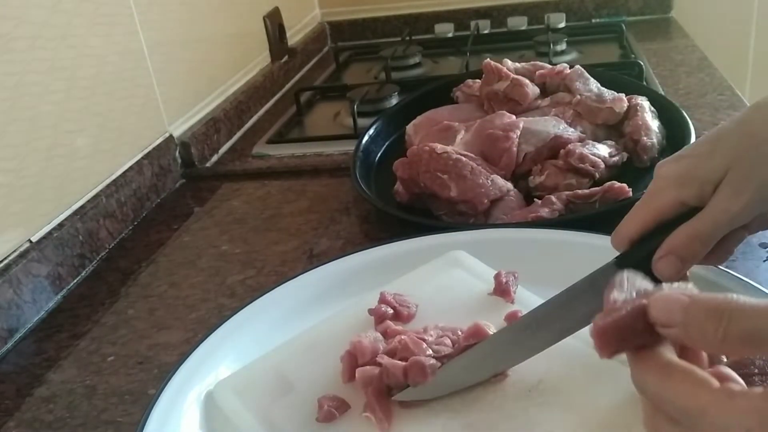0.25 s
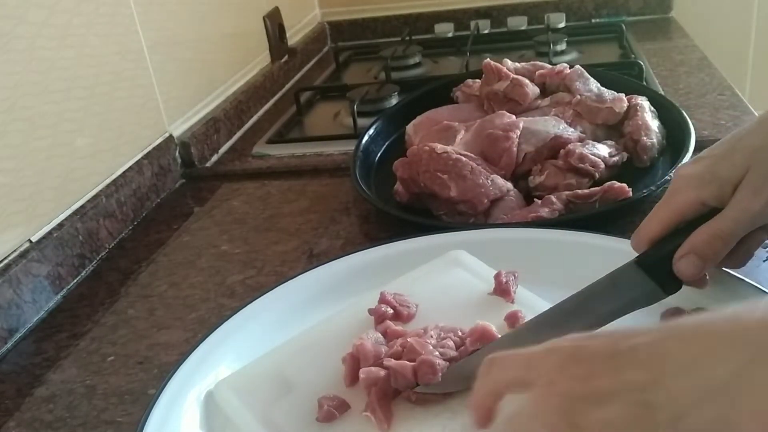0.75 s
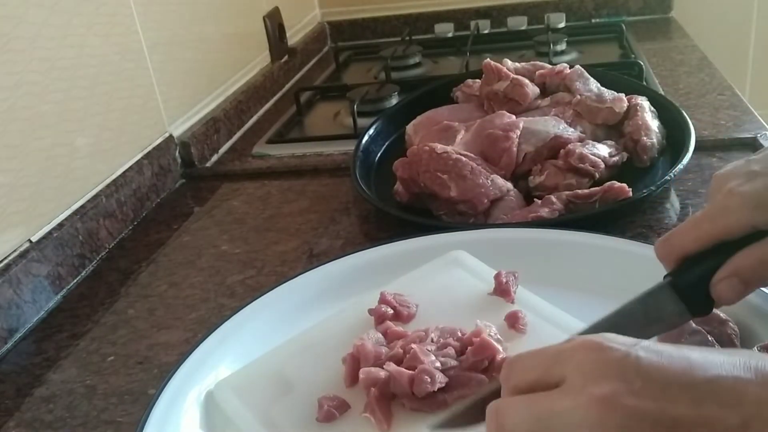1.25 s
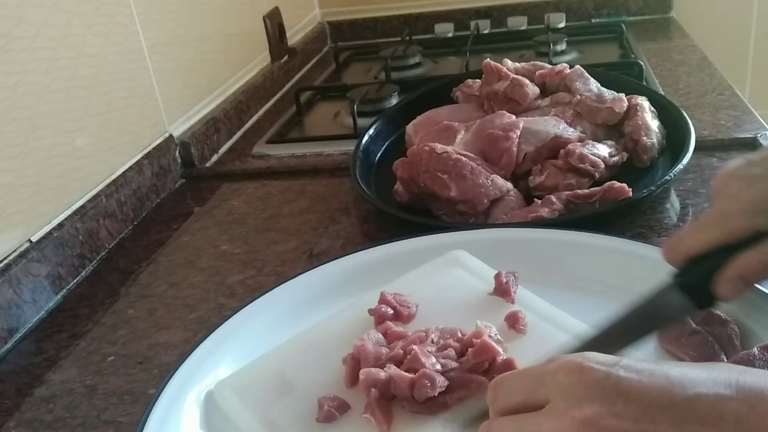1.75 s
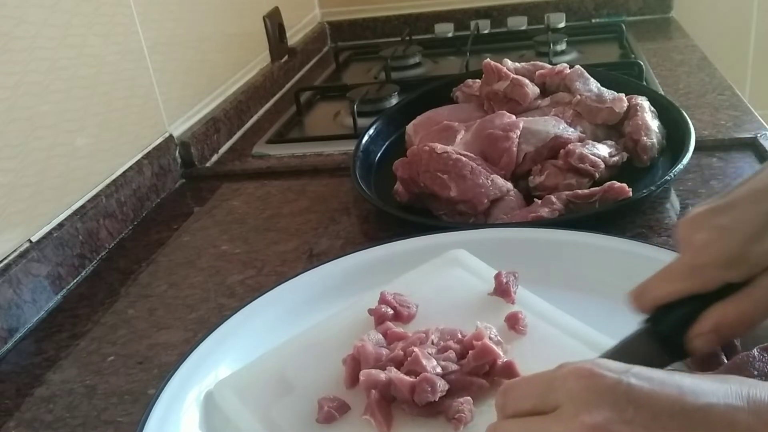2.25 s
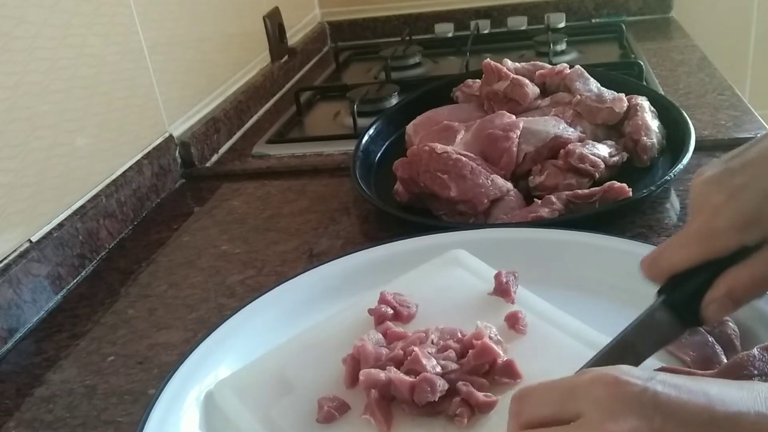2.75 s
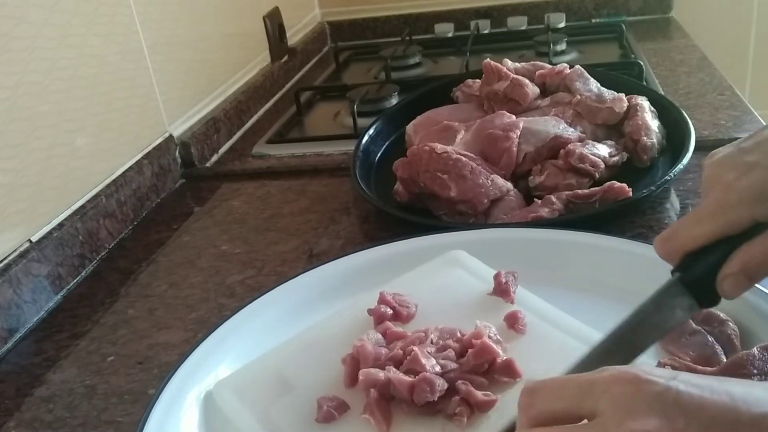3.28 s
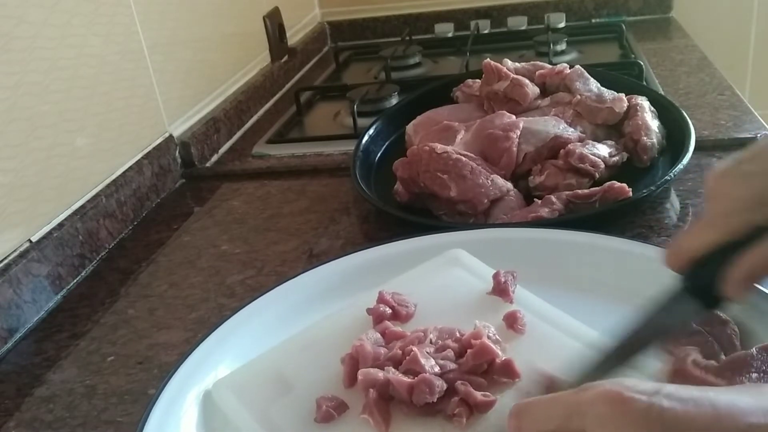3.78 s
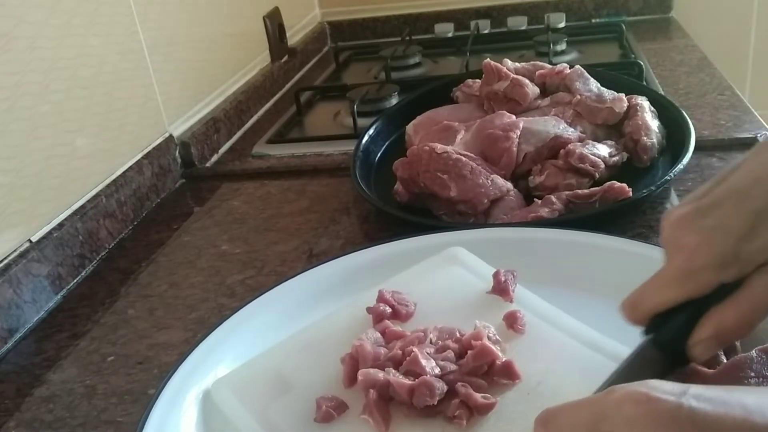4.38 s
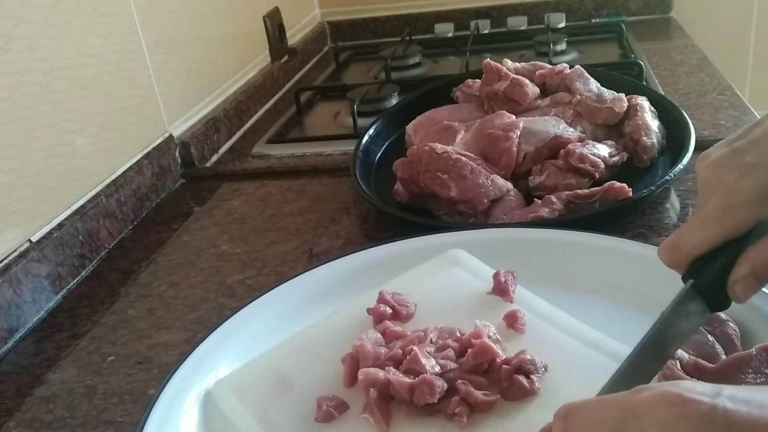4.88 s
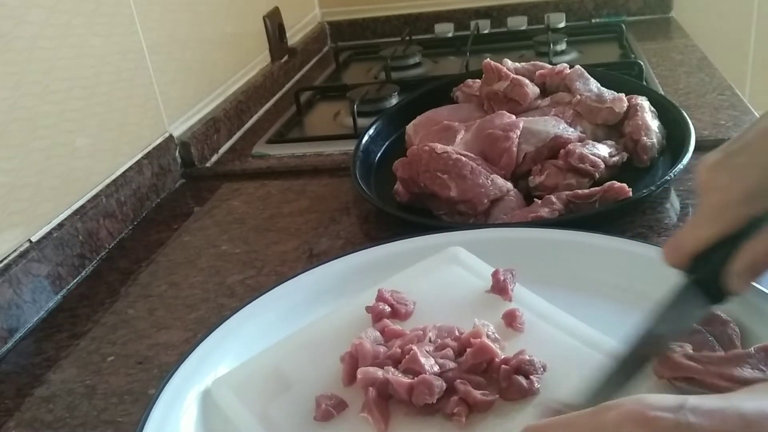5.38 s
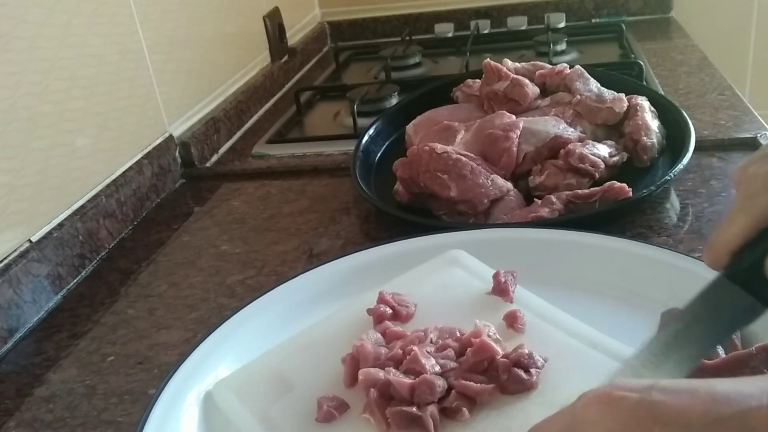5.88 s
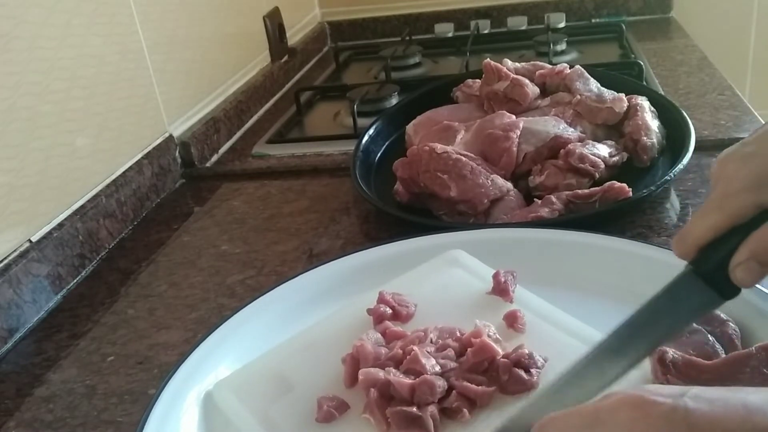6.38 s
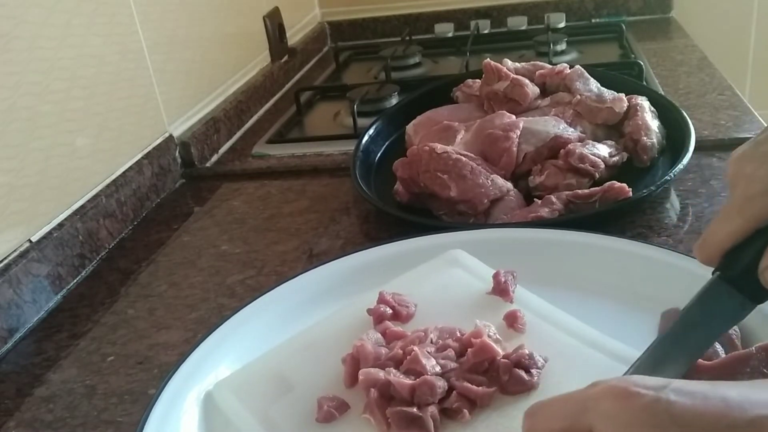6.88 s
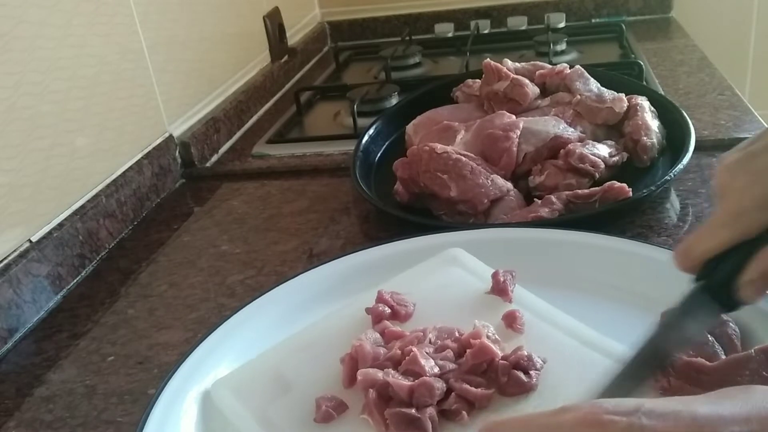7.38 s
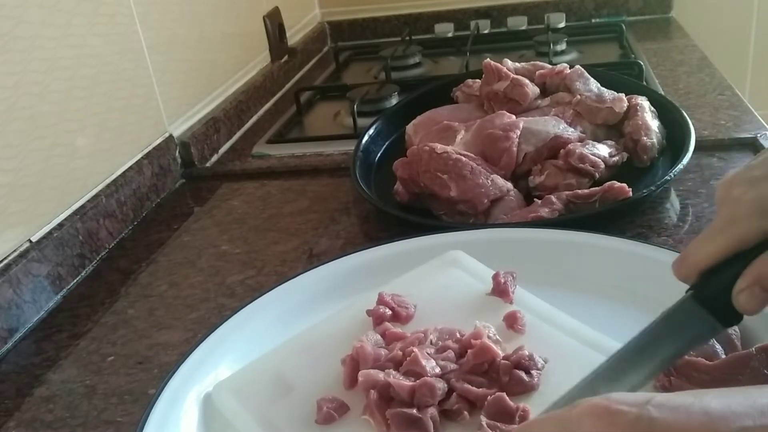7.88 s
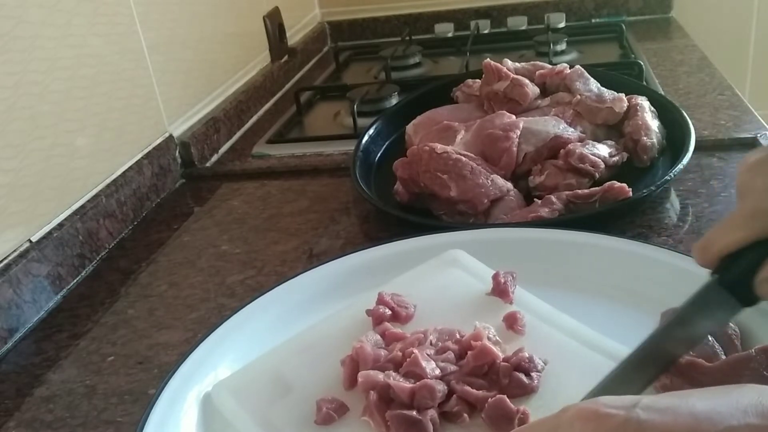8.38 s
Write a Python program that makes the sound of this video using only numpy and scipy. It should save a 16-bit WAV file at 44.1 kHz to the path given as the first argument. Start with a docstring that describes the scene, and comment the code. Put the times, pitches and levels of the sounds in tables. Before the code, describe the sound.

Over a humming fridge in a small kitchen, a blade cuts wetly through meat and clacks against a plastic cutting board.

```python
"""A kitchen knife dices raw meat on a plastic board lying in a large platter, while a fridge hums
in the small tiled kitchen. The edge scrapes the board and a piece is laid down. Six cuts follow, each
a push and a pull of wet crackle, then a short hard scrape as the edge reaches the board and sets the
platter ringing; now and then the hand bumps the counter. In a lull, two faint swells of narrow hiss
pass around a brighter wet squelch. Two more cuts close the scene, the last with the hardest scrape."""
import sys
import numpy as np
from scipy import signal
from scipy.fft import rfft, irfft
from scipy.io import wavfile
from scipy.ndimage import uniform_filter1d

SR = 44100
rng = np.random.default_rng(int(sys.argv[2]) if len(sys.argv) > 2 else 0)


def output_pcm(signal):
    """Save a mono or channel-first signal as 16-bit PCM at the path in sys.argv[1].

    Samples are clipped to [-1, 1] before scaling.
    """
    pcm = np.clip(np.atleast_2d(signal).T, -1, 1) * 32767
    wavfile.write(sys.argv[1], SR, np.round(pcm).astype(np.int16))


N = 381024
T = np.arange(N) / SR
FREQS = np.arange(N // 2 + 1) * SR / N
STROKE_T = np.arange(-SR // 4, SR // 4) / SR  # seconds around the peak of a stroke
COMPRESSOR_HZ = 48.83  # shaft turns per second

# the edge scrapes the board: (peak time [s], level [dB], rise [s], fall [s], steel rasp [dB],
# knock centre [Hz], knock [dB], platter ring [dB], ring centre [Hz])
SCRAPES = [(0.009, -27.5, 0.0049, 0.0016, -9, 1120, -21, -6, 910),
           (.744, -46, 0.0039, 0.016, -4, 1150, -25, -1.5, 895),
           (1.741, -31.5, 0.0057, 0.0084, -11, 1165, -22, -1.5, 943),
           (2.155, -40, 0.0057, 0.01, -14, 1390, -10.5, -1, 910),
           (2.425, -32.5, 0.0082, 0.0076, -5, 2140, -10.5, -6, 990),
           (2.816, -36.5, 0.0049, 0.0087, -13, 1700, -20, -5.5, 895),
           (3.089, -30.5, 0.0089, 0.015, -5, 1270, -6.5, -14, 1154),
           (3.770, -37, 0.0051, 0.012, 0.5, 1480, -20, -7.5, 840),
           (4.596, -31.5, 0.00853, .011, -1.5, 1340, -10, -10, 1010),
           (5.047, -36.5, .0055, 0.0091, -11, 1250, -9, -2.5, 984),
           (5.374, -33, 0.0054, 0.01, -5, 1310, -13.5, -6, 940),
           (7.391, -26, 0.0077, 0.011, -1.5, 1670, -15, -8, 940),
           (8.436, -23, 0.007, 0.022, -2, 1420, -8, -3, 910)]
# hollow modes of the board: (pitch [Hz], level [dB], t60 [s])
BOARD_MODES = [(1042, -0.5, .09), (1166, -7, 0.075), (1250, -6, 0.094), (1300, 2, 0.059), (1393, 6, 0.057),
               (1608, -14, 0.1), (1755, 1, 0.09), (2084, 0, 0.084)]
# dull clack of the plastic: (frequency [Hz], level [dB])
BOARD_COLOUR = [(150, -31), (330, -10.5), (470, -16), (570, -3.5), (720, -4), (1000, 1.5), (1400, -2.5),
                (1700, -7.5), (1920, -8.5), (2110, -9.5), (2400, -12), (2800, -11), (3700, -16.5),
                (5000, -35), (12000, -40)]
# bright rasp of the steel edge: (frequency [Hz], level [dB])
EDGE_COLOUR = [(1200, -20), (2400, 3), (3900, 7.5), (4700, 4), (6000, 1), (7900, 1.5), (9000, 3.5),
               (10200, 3), (11500, -1), (15500, -15.5)]
# wet sizzle of the meat: (frequency [Hz], level [dB])
MEAT_COLOUR = [(800, -17), (2000, -13.5), (3900, 0), (5000, -3.5), (7000, -6), (8400, 0.5), (10000, -0.5),
               (11800, -3.5), (13800, -11), (15500, -11)]


def undb(db):
    """Decibels to gain."""
    return np.exp(np.asarray(db) * (np.log(10) / 20))


def unit(x):
    """Scale to rms 1."""
    return x / np.sqrt(np.mean(x ** 2))


def along(points, hz):
    """Read (frequency, value) points on a log-frequency axis."""
    f, value = np.transpose(points)
    return np.interp(np.log(np.maximum(hz, 1)), np.log(f), value)


def through(x, h):
    """Pass a sound through an impulse response."""
    return signal.fftconvolve(x, h)[:len(x)]


def add(track, s, x):
    """Mix a sound into a track from time s on."""
    start = int(s * SR)
    lo, hi = max(start, 0), min(start + len(x), N)
    track[lo:hi] += x[lo - start:hi - start]


def wander(per_s):
    """Smooth random drift with a spread near 1."""
    hold = max(int(SR / per_s), 2)
    steps = np.repeat(rng.standard_normal(N // hold + 1), hold)
    return 1.3 * uniform_filter1d(steps, hold)[:N]


def noise(colour, repeat=0):
    """Coloured noise with steep ends; a share of its treble repeats with every compressor turn."""
    turn = rng.standard_normal(round(SR / COMPRESSOR_HZ))
    share = repeat * FREQS ** 2 / (FREQS ** 2 + 1000 ** 2)
    fresh = np.sqrt(1 - share) * rfft(rng.standard_normal(N))
    looped = np.sqrt(share) * rfft(np.resize(turn, N))
    high_cut = 1 + (FREQS / colour[-1][0] / 1.2) ** 8
    low_cut = 1 + (colour[0][0] / 1.5 / (FREQS + 1e-3)) ** 6
    return unit(irfft((fresh + looped) * undb(along(colour, FREQS)) / np.sqrt(high_cut * low_cut), N))


def response(colour, boost_hz=1000, boost_db=0, octaves=1, peaks=(), size=1024):
    """Impulse response of unit energy: a colour with an optional broad boost and narrow resonances."""
    hz = np.arange(size // 2 + 1) * SR / size
    db = along(colour, hz) + boost_db * np.exp(-(np.log2((hz + 1) / boost_hz) / octaves) ** 2)
    db += sum(height / (1 + (2 * (hz - centre) / width) ** 2) for centre, width, height in peaks)
    cepstrum = irfft(np.log(undb(db)))
    cepstrum[1:size // 2] *= 2  # minimum phase keeps the attack sharp
    cepstrum[size // 2 + 1:] = 0
    h = irfft(np.exp(rfft(cepstrum)))
    return h / np.linalg.norm(h)


def friction(rise, fall, per_s, spread_db, shape=1.02, catch_db=0, catch_s=.005):
    """Tiny uneven slips swell and die over a stroke; with catch_db the edge catches and lets go."""
    force = np.exp(-np.abs(STROKE_T / np.where(STROKE_T < 0, rise, fall)) ** shape)
    n, held = len(force), int(catch_s * SR)
    slips = (rng.random(n) < per_s / SR) * rng.choice([-1, 1], n)
    sizes = undb(spread_db * np.minimum(rng.exponential(size=n), 4))
    catches = undb(catch_db * np.repeat(2 * rng.random(n // held + 1) - 1, held)[:n])
    grains = slips * sizes * force * catches
    return grains * np.linalg.norm(force) / (np.linalg.norm(grains) + 1e-12)


def ring(modes, centre_hz, focus_db, attack_s, detune, size=22050):
    """A struck body rings: the place of the blow picks the loudest modes, and the load detunes them."""
    t, tone = np.arange(size) / SR, 0
    for hz, db, t60 in modes:
        pitch, phase = hz * (1 + detune * rng.standard_normal()), rng.random()
        gain = undb(db - focus_db * np.sqrt(abs(np.log2(hz / centre_hz))))
        tone += gain * np.exp(-np.log(1000) * t / t60) * np.sin(2 * np.pi * (pitch * t + phase))
    return tone / np.sqrt(np.mean(tone[:size // 10] ** 2)) * (1 - np.exp(-t / attack_s))


def kitchen(x, tail_db, early_db, early_s, size=22050):
    """Direct sound in stereo, quick echoes off worktop and tiles, then the room's tail."""
    # decay of the room: (frequency [Hz], t60 [s])
    room_t60 = [(200, 0.46), (1000, 0.41), (3000, 0.49), (8000, 0.32), (15000, 0.16)]
    # stereo phase of the direct sound: (frequency [Hz], left lead [rad])
    left_lead = [(300, -.5), (650, .4), (850, 2.2), (1020, 2.3), (1220, 0), (1800, 0), (3400, -1.5),
                 (4600, 0), (15000, 0)]
    # pan of the direct sound: (frequency [Hz], left minus right [dB])
    balance = [(600, 1), (1500, 1), (4000, -1.5), (8500, -2.5), (11000, 0)]
    t, hz = np.arange(size) / SR, np.arange(size // 2 + 1) * SR / size
    centres, out = 125 * 2. ** np.arange(8), []
    for side in (.5, -.5):
        spectrum, tail = rfft(rng.standard_normal(size)), 0
        for centre, share in zip(centres, np.eye(len(centres))):
            band = irfft(spectrum * along(np.c_[centres, share], hz), size)
            tilt = undb(-.8 * np.log2(centre / 1000))
            tail += tilt * band * np.exp(-np.log(1000) * t / along(room_t60, centre))
        tail *= 1 - np.exp(-t / .0046)
        early = rng.standard_normal(size) * np.exp(-t / early_s) * (t > .001)
        room = undb(tail_db) * tail / np.linalg.norm(tail)
        room += undb(early_db) * early / np.linalg.norm(early)
        pan = undb(side * along(balance, FREQS)) * np.exp(1j * side * along(left_lead, FREQS))
        out.append(irfft(rfft(x) * pan, N) + through(x, room))
    return np.array(out)


def room_tone(waver_db=.4):
    """Steady air: a rumble near the centre and a wider hiss with a trace of the compressor's buzz."""
    # low rumble of the air: (frequency [Hz], level [dB])
    rumble = [(20, -10), (33, 1.5), (50, -14), (72, -11), (86, -17), (103, -0.5), (122, -9), (152, 2),
              (174, -11.5), (198, -2.5), (222, -8), (268, 0.5), (305, -8), (340, -14), (600, -19.5)]
    # hiss of the air: (frequency [Hz], level [dB])
    hiss = [(300, -35), (480, 1), (610, -8), (850, 2.5), (1100, -3.5), (1900, -8), (2500, -4.5), (3000, 4),
            (3170, -6), (3700, -1.5), (4400, -9), (5400, -9.5), (7000, -5.5), (9000, 0), (11200, -2),
            (12000, -8.5), (15500, -14)]
    # stereo width: (frequency [Hz], side against mid [dB])
    width = [(40, -7), (150, -12.5), (300, -8), (600, 1.5), (2000, -0.5), (6000, 3), (8500, -19.5),
             (15000, -16)]
    out = 0
    for colour, db, repeat in ((rumble, -53.5, 0), (hiss, -59, .49)):
        mid = noise(colour, repeat)
        side = irfft(rfft(noise(colour, repeat)) * undb(along(width, FREQS)), N)
        out += undb(db + waver_db * wander(5)) * np.array([mid + side, mid - side])
    return out


def fridge(rattle_db=-61, throb_db=4):
    """The compressor's shell buzzes once a turn, so hum and rattle throb together; a fan drones along."""
    # compressor hum: (harmonic [multiple of the shaft rate], level [dB])
    harmonics = [(1, -61.5), (2, -66.5), (4, -66.5), (10, -72.5), (11, -78), (12, -62), (13, -57.5),
                 (14, -80.5), (16, -74.5), (53, -80), (54, -70.5), (55, -87), (57, -66), (59, -91),
                 (61, -68.5), (62, -70.5), (63, -74), (68, -75), (74, -83), (75, -73.5), (76, -84.5),
                 (82, -81)]
    # fan and motor tones: (pitch [Hz], level [dB], waver [dB])
    fan_tones = [(133.5, -52.5, 1.15), (300, -60.5, 1.3)]
    # pan of the tones: (frequency [Hz], left minus right [dB])
    balance = [(50, -2), (134, -1), (300, -3.5), (620, -4), (2800, 1), (3700, 10.5)]
    # compressor rattle: (frequency [Hz], level [dB])
    rattle_colour = [(2000, -32), (2600, -10.5), (3000, 7.5), (3250, -21), (4000, -20)]
    turns = np.cumsum(COMPRESSOR_HZ * (1 + .0002795 * wander(1.78))) / SR
    sides, hum = np.array([[.5], [-.5]]), 0
    for k, db in harmonics:
        hz = k * COMPRESSOR_HZ
        start, lead = rng.standard_normal(2)
        phase = 2 * np.pi * k * turns + .2 * start + sides * .23 * lead * np.sqrt(hz / 1000)
        hum += undb(db + .5 * wander(5) + sides * along(balance, hz)) * np.sin(phase)
    for hz, db, waver_db in fan_tones:
        gain = undb(db + waver_db * wander(6) + sides * along(balance, hz))
        hum += gain * np.sin(2 * np.pi * hz * T + .37 * wander(4))
    throb = unit(undb(throb_db * np.cos(2 * np.pi * turns)))
    rattle = np.array([noise(rattle_colour), noise(rattle_colour)])
    return np.sqrt(2) * hum + undb(rattle_db) * throb * rattle


def counter_bumps():
    """The hand's weight sets off dull, quickly damped swings of the worktop."""
    # low thuds: (time [s], level [dB], pitch [Hz])
    thuds = [(.745, -35.5, 49), (1.60, -43, 54.4), (2.30, -34, 50.6), (4.27, -37, 52.4),
             (5.038, -35.5, 86.5), (7.97, -37, 45.6)]
    out, t = np.zeros(N), np.arange(SR // 2) / SR
    envelope = (1 - np.exp(-t / .022)) * np.exp(-t / .029)
    for s, db, hz in thuds:
        add(out, s, undb(db + 3.5) * envelope * np.sin(2 * np.pi * hz * t))
    return out


def squelches_and_hiss():
    """Bright wet squelches fizz faintly, with two brief swells of narrow hiss near 4.8 kHz among them."""
    # faint fizzes: (peak time [s], level [dB], rise and fall [s], centre [Hz])
    fizzes = [(0.592, -56, .01, 12000), (1.373, -60, .012, 9000), (1.466, -49, 0.022, 12000),
              (2.103, -53, .01, 10000), (3.365, -58, 0.011, 11500), (3.872, -56.5, .03, 8400),
              (5.254, -48, .018, 13500), (6.09, -62, 0.044, 4800), (6.257, -60.5, 0.055, 9900),
              (6.778, -63, 0.074, 4800)]
    out = np.zeros(N)
    for s, db, swell, hz in fizzes:
        fizz = friction(swell, swell, per_s=1200, spread_db=4.5)
        band = response(MEAT_COLOUR, hz, boost_db=17, octaves=.71)
        add(out, s + STROKE_T[0], undb(db) * through(fizz, band))
    return out


def snaps():
    """Wet meat unsticks in a few milliseconds of bright clicks."""
    # the meat lets go: (time [s], level [dB], centre [Hz])
    releases = [(.723, -51, 9000), (.741, -41.5, 4500), (1.454, -36.5, 11800), (2.123, -40.5, 7900),
                (4.326, -43, 9000), (5.042, -40, 7500), (7.016, -48.5, 8000)]
    out = np.zeros(N)
    for s, db, hz in releases:
        clicks = friction(.001, .005, per_s=5000, spread_db=2)
        add(out, s + STROKE_T[0], undb(db) * through(clicks, response(MEAT_COLOUR, hz, boost_db=15)))
    return out


def blade(colour, detune=.035, spread_db=2):
    """A colour with the blade's resonances, which grip and clinging meat shift and damp each stroke."""
    # the hand-held blade: (frequency [Hz], width [Hz], height [dB])
    resonances = [(2080, 80, -27), (3510, 200, 3), (6310, 700, 3), (7310, 480, 5.5), (8350, 160, 8),
                  (9250, 920, 3.5), (10050, 110, -15), (11800, 140, -4)]
    chance = rng.standard_normal((len(resonances), 2))
    peaks = [(hz * (1 + detune * shift), width, db + spread_db * lift)
             for (hz, width, db), (shift, lift) in zip(resonances, chance)]
    return response(colour, peaks=peaks)


def juice_pops(rise, fall, per_s=420, middle_hz=8600, octaves=.398, ring_cycles=7):
    """Tiny pockets of juice burst during a stroke, each ringing briefly at its own pitch."""
    out, t = np.zeros(len(STROKE_T)), np.arange(SR // 100) / SR
    for when, pitch, strength in rng.standard_normal((int(per_s * (rise + fall)) + 1, 3)):
        hz = np.clip(middle_hz * 2 ** (octaves * pitch), 2500, 15000)
        offset_s = .65 * when * (rise if when < 0 else fall)
        start = np.clip(len(out) // 2 + int(offset_s * SR), 0, len(out) - len(t))
        ping = np.sin(2 * np.pi * hz * t) * np.exp(-t * hz / ring_cycles)
        out[start:start + len(t)] += undb(3.5 * strength) * ping
    return out * np.sqrt((rise + fall) * SR / 2) / np.linalg.norm(out)


def strokes(push_rise_s=.035, push_fall_s=.023):
    """Every slide of the meat: pieces being placed, then a short push and a longer pull for each cut."""
    # a piece is laid down or slid aside: (peak time [s], level [dB], rise and fall [s], drag [dB])
    placings = [(0.792, -48.5, 0.028, -7), (0.9, -62.5, 0.085, 3), (5.255, -41.5, .017, -1.5)]
    # cuts through the meat: (push time [s], push level [dB], push drag [dB],
    # pull time [s], pull level [dB], pull rise [s], pull drag [dB])
    cuts = [(1.505, -52.5, 4, 1.605, -44.5, 0.05, -2), (2.155, -45.5, 2, 2.267, -43.5, 0.056, -2),
            (2.812, -43.5, 0.5, 2.947, -46, 0.071, -4.5), (3.482, -43.5, 2.5, 3.56, -46, 0.073, -2),
            (4.294, -42.5, 0, 4.463, -44.5, 0.073, -2.5), (5.036, -46.5, 0.5, 5.21, -47.5, 0.076, -4),
            (7.073, -51, -2.5, 7.208, -45.5, .052, -2.5), (8.089, -50, -2, 8.265, -49.5, 0.069, 0.5)]
    for s, db, swell, drag_db in placings:
        yield s, db, swell, swell, drag_db
    for push_s, push_db, push_drag_db, pull_s, pull_db, pull_rise, pull_drag_db in cuts:
        yield push_s, push_db, push_rise_s, push_fall_s, push_drag_db
        yield pull_s, pull_db, pull_rise, .9 * pull_rise, pull_drag_db


def slices(pop_lag_s=.005):
    """Wet fibres catch and part in a fine crackle, pops trail them, and the tip drags on the board."""
    out, board = np.zeros(N), response(BOARD_COLOUR, 2200, boost_db=3.5)
    for s, db, rise, fall, drag_db in strokes():
        fibres = friction(rise, fall, per_s=2000, spread_db=-2.5, shape=2.06, catch_db=4)
        crackle = through(fibres, blade(MEAT_COLOUR))
        drag = through(friction(rise, fall, per_s=600, spread_db=2, shape=1.4, catch_db=4), board)
        add(out, s + STROKE_T[0], undb(db - 3) * (crackle + undb(drag_db) * drag))
        add(out, s + pop_lag_s + STROKE_T[0], undb(db - 5.5) * juice_pops(rise, fall))
    return out


def taps(damp_s=.005):
    """Single touches of the edge click and knock the board, and the pressing blade damps it at once."""
    # the edge touches down or bounces: (time [s], level [dB], knock centre [Hz], dry click [dB])
    touches = [(.741, -45, 1160, -2), (1.733, -39, 1060, -7), (1.745, -39, 1730, -3),
               (2.402, -44, 1250, -12), (2.411, -43, 1250, -8), (2.813, -38, 1330, -10),
               (3.096, -29, 1200, -3), (3.766, -38.5, 1250, -3), (3.778, -40, 1730, 5),
               (4.593, -30.5, 1250, -4), (5.042, -38, 1250, -5), (5.359, -40, 1320, -6),
               (5.365, -37, 1320, -7), (8.432, -24, 1340, -4)]
    out, edge = np.zeros(N), response(EDGE_COLOUR, 1900, boost_db=14)
    for s, db, hz, click_db in touches:
        knock = ring(BOARD_MODES, hz, focus_db=16, attack_s=.00031, detune=.033, size=4410)
        add(out, s, undb(db + 1) * knock * np.exp(-np.arange(len(knock)) / SR / damp_s))
        click = through(friction(.0003, .0015, per_s=9000, spread_db=1), edge)
        add(out, s + STROKE_T[0], undb(db + click_db) * click)
    return out


def knocks():
    """As the edge lands, the board gives a short hollow knock and the platter under it rings on."""
    # modes of the platter: (pitch [Hz], level [dB], t60 [s])
    platter_modes = [(712, -10, 0.35), (811, 2, 0.22), (858, -1, 0.15), (898, 5.5, 0.14), (945, 4.5, 0.24),
                     (990, -7, 0.28), (1175, -0.5, 0.22), (1334, -5, 0.22), (1428, -11, 0.2)]
    out = np.zeros(N)
    for s, db, rise, _, _, knock_hz, knock_db, ring_db, ring_hz in SCRAPES:
        board = ring(BOARD_MODES, knock_hz, focus_db=15, attack_s=.00085, detune=.013)
        platter = ring(platter_modes, ring_hz, focus_db=20, attack_s=.002, detune=.0029)
        add(out, s - rise / 2, undb(db) * (undb(knock_db) * board + undb(ring_db) * platter))
    return out


def scrapes(tick_db=-5.5, slide_db=-19.5):
    """The edge judders over the plastic: it bites with a tick, the board clacks and the steel rasps."""
    out, edge = np.zeros(N), response(EDGE_COLOUR, 2200, boost_db=12)
    for s, db, rise, fall, rasp_db, knock_hz, *_ in SCRAPES:
        start = s + STROKE_T[0]
        judder = friction(rise, fall, per_s=2000, spread_db=2.5, shape=.95)
        clack = through(judder, response(BOARD_COLOUR, knock_hz, boost_db=3.5, octaves=.085))
        rasp = through(friction(rise * .95, fall * 1.24, per_s=3000, spread_db=2.5), blade(EDGE_COLOUR))
        add(out, start, undb(db) * (clack + undb(rasp_db) * rasp))
        tick = through(friction(.0005, .002, per_s=7000, spread_db=1), edge)
        add(out, start - rise / 2, undb(db + tick_db) * tick)
        # the edge slides through the last of the meat on its way down
        slide = through(friction(.025, .0495, per_s=2500, spread_db=1, shape=1.1), blade(MEAT_COLOUR))
        add(out, start, undb(db + slide_db) * slide)
    return out


def scene():
    """Knife work in the tiled kitchen over the steady hum, the mix leaning slightly right."""
    cutting = scrapes() + slices() + snaps() + squelches_and_hiss()
    knife = undb(-2) * kitchen(cutting, tail_db=-5.5, early_db=0, early_s=.0052)
    impacts = kitchen(knocks() + taps(), tail_db=-11, early_db=-7, early_s=.003)
    ambience = fridge() + room_tone()
    return (knife + impacts + counter_bumps() + ambience) * undb([[-.27], [.27]])


def record(dry):
    """A steep low-pass trims the very top."""
    return signal.sosfilt(signal.ellip(10, .1, 80, 15800, fs=SR, output="sos"), dry)


dry = scene()
out = record(dry)
output_pcm(out)
```